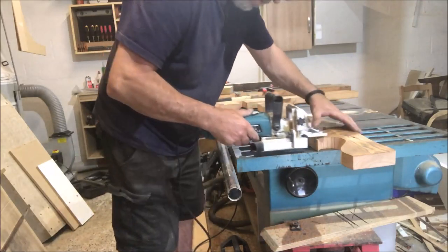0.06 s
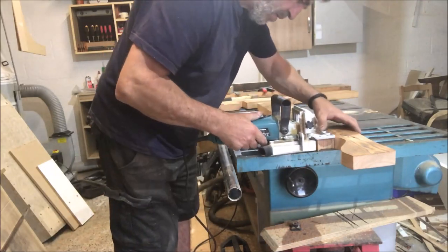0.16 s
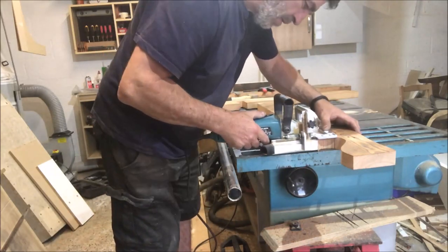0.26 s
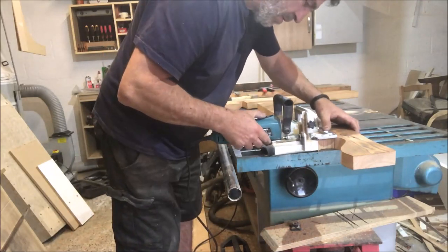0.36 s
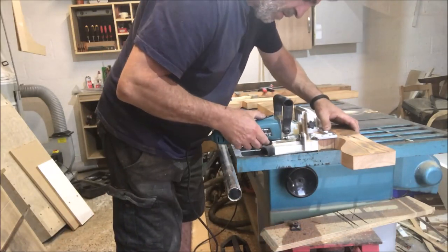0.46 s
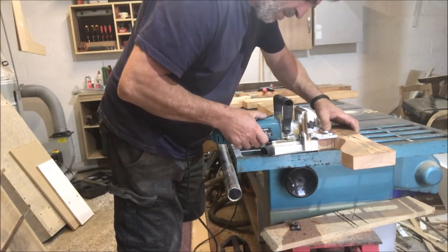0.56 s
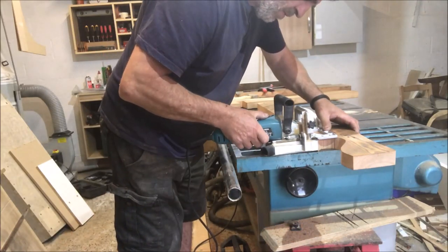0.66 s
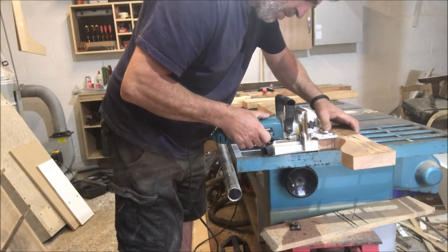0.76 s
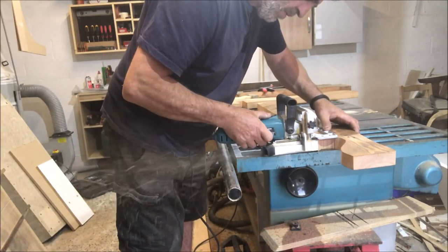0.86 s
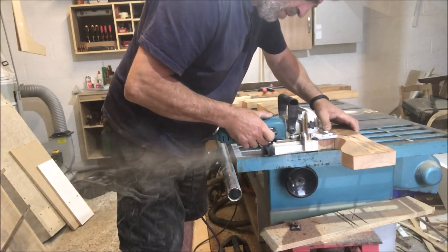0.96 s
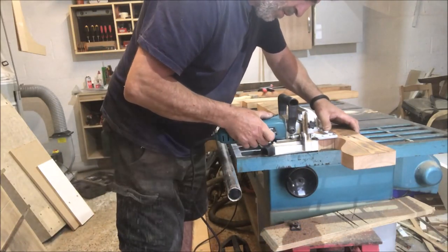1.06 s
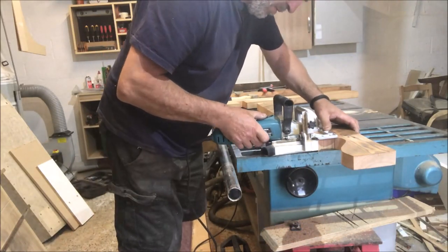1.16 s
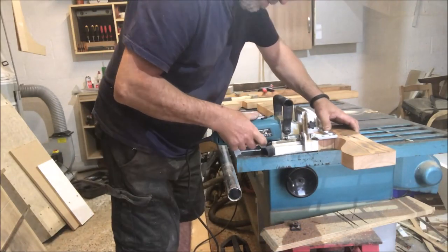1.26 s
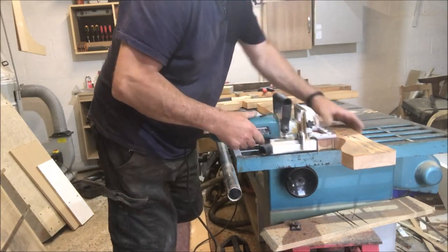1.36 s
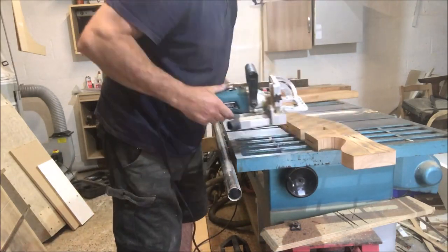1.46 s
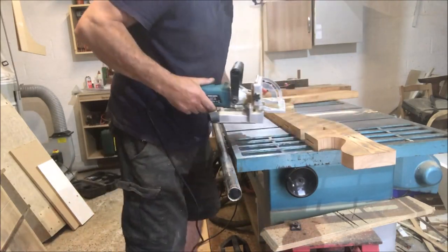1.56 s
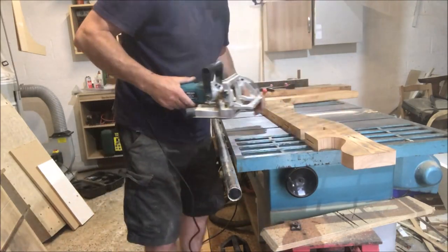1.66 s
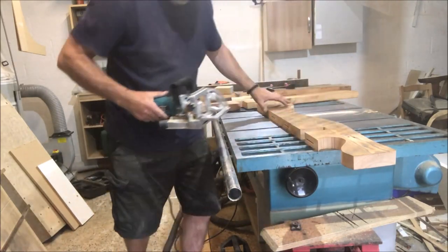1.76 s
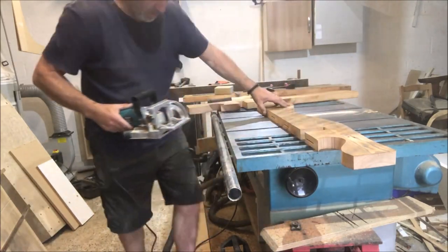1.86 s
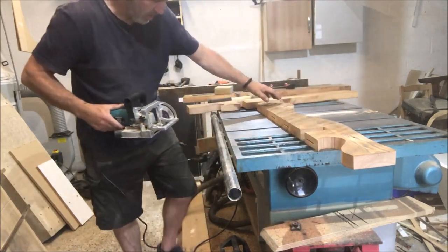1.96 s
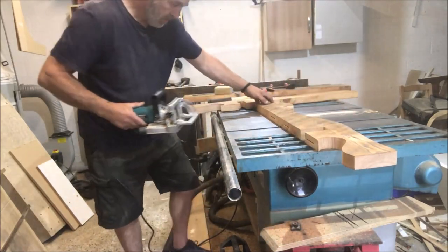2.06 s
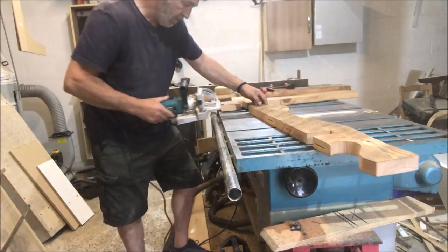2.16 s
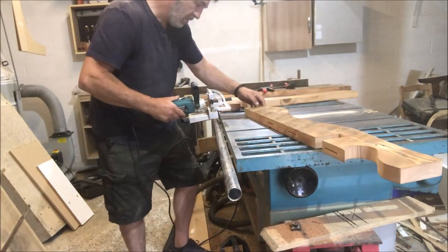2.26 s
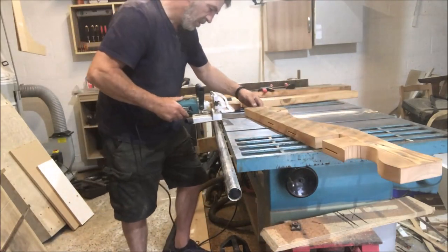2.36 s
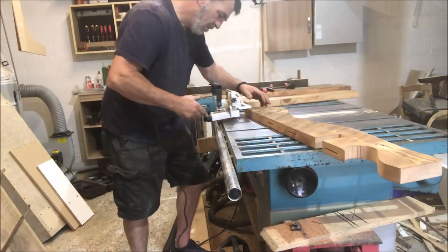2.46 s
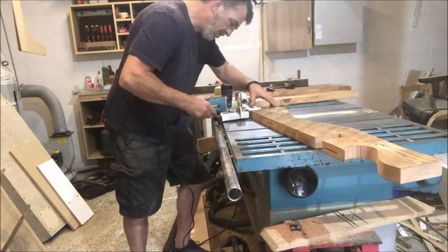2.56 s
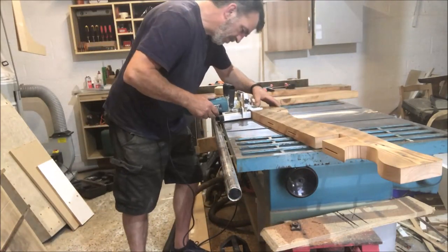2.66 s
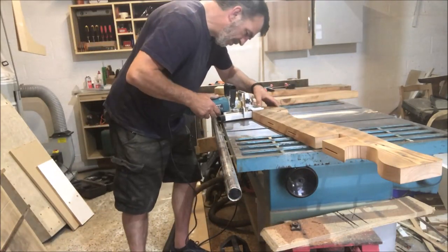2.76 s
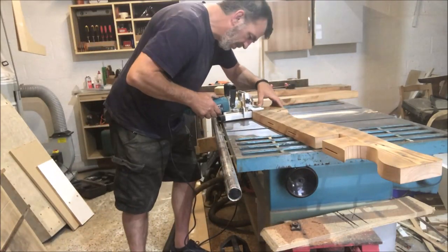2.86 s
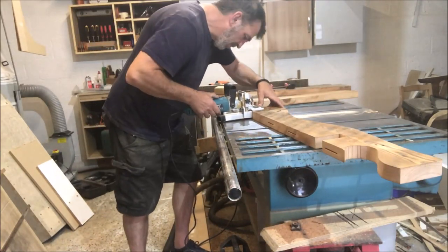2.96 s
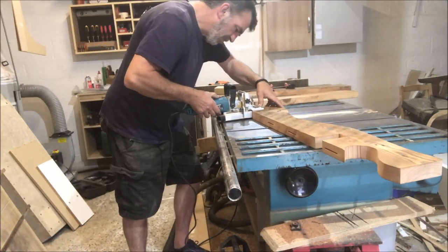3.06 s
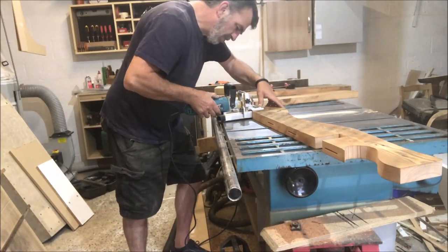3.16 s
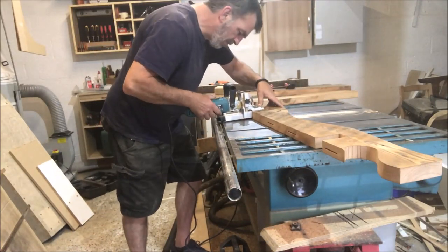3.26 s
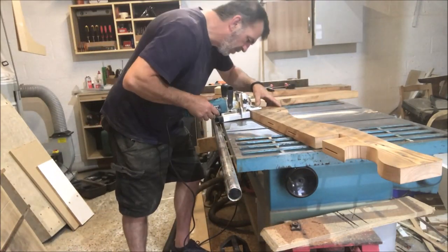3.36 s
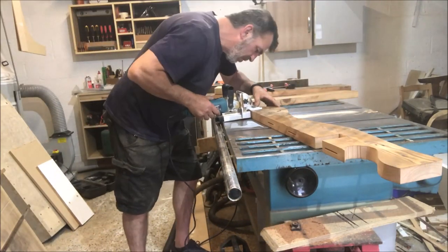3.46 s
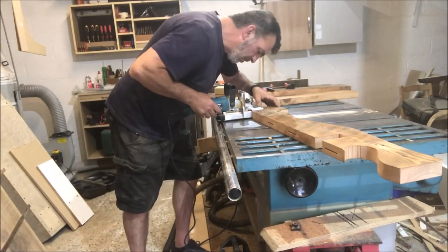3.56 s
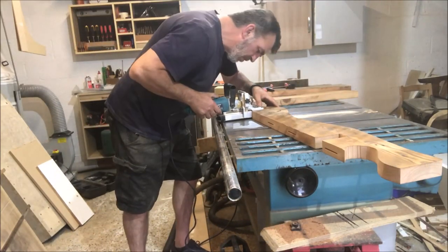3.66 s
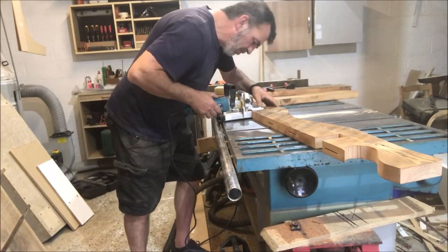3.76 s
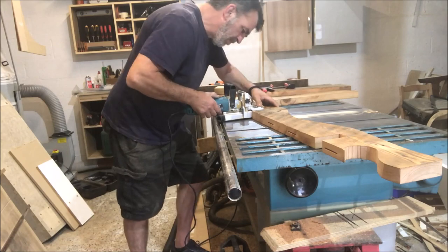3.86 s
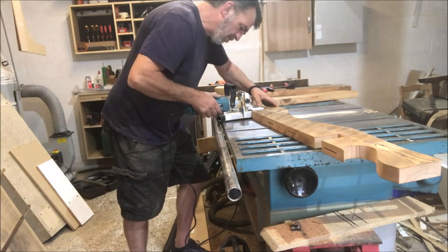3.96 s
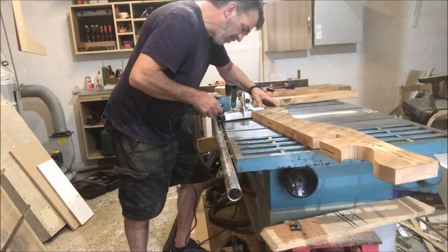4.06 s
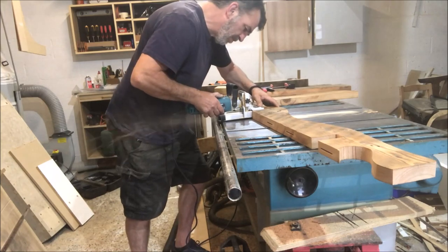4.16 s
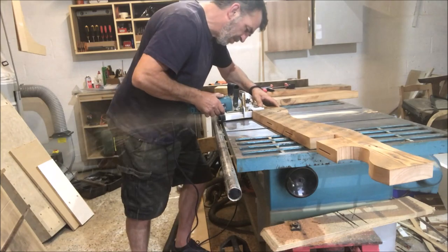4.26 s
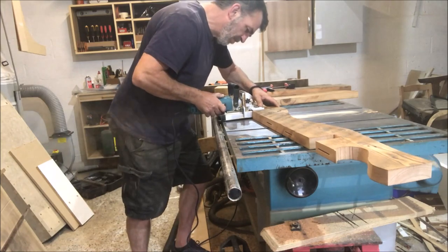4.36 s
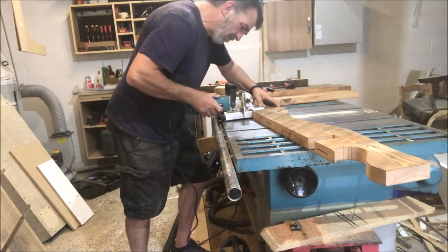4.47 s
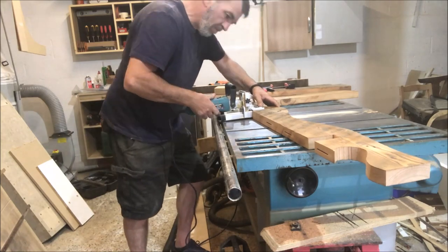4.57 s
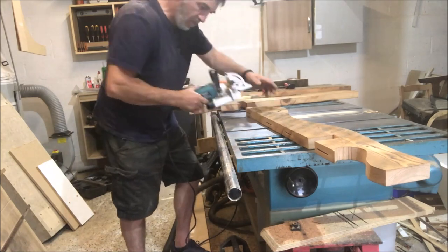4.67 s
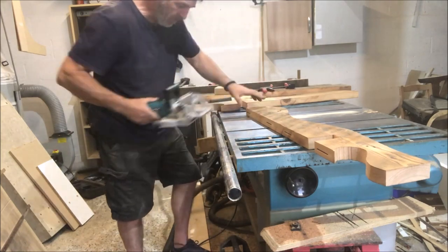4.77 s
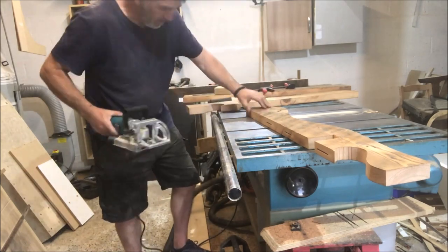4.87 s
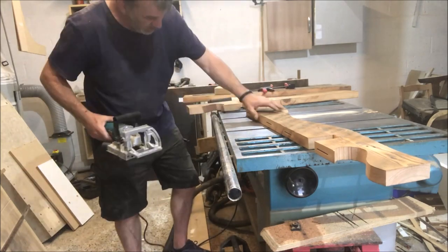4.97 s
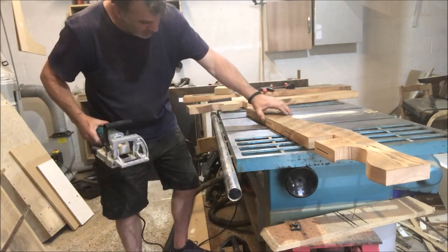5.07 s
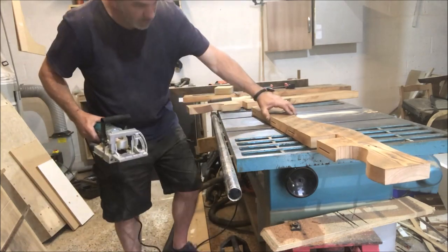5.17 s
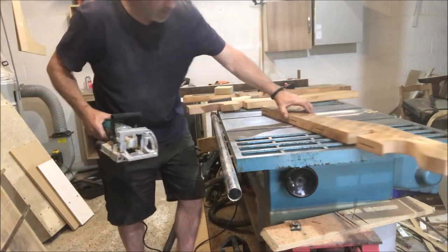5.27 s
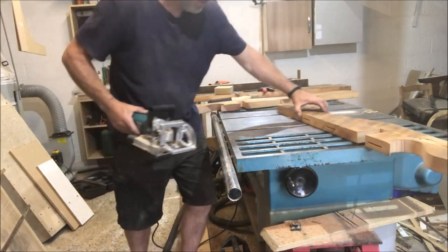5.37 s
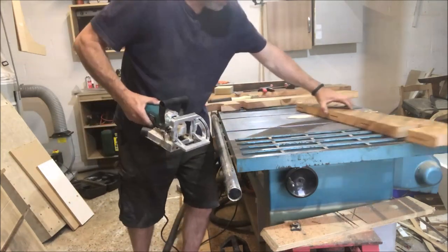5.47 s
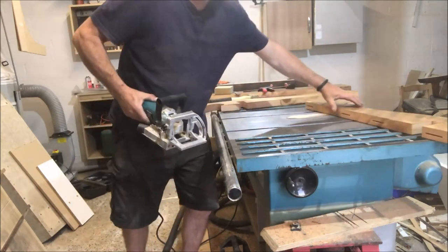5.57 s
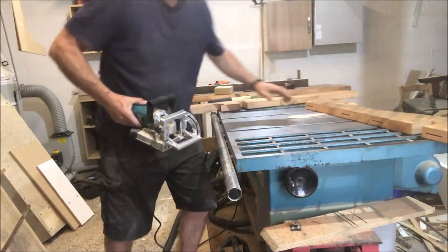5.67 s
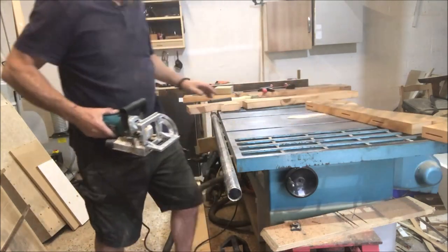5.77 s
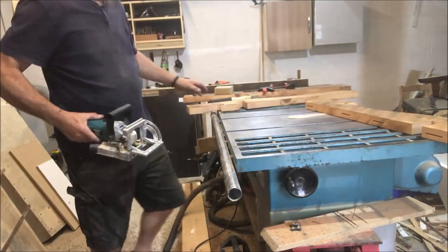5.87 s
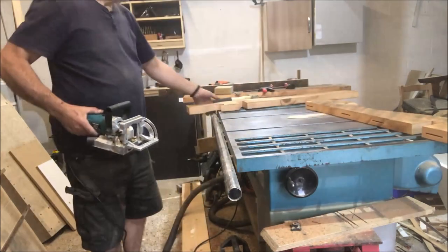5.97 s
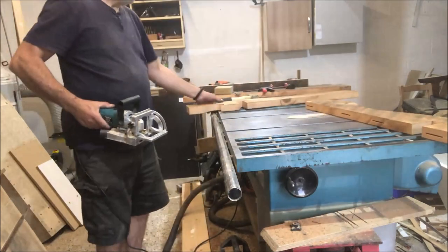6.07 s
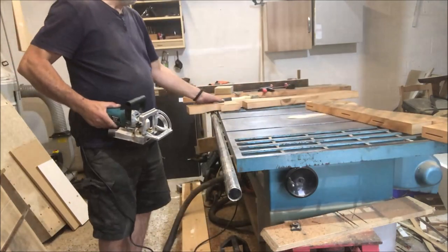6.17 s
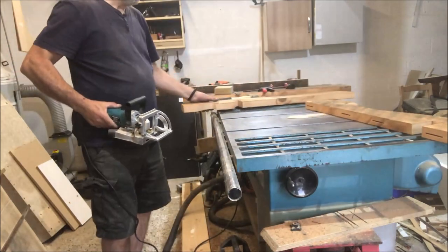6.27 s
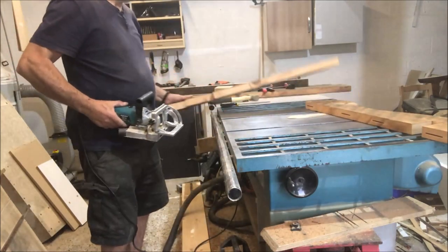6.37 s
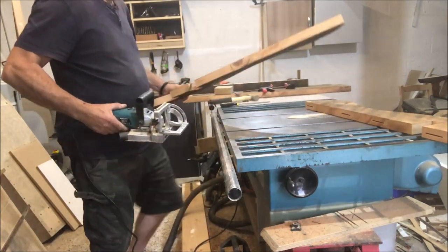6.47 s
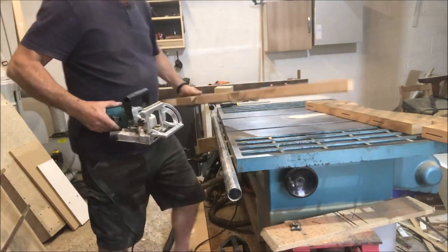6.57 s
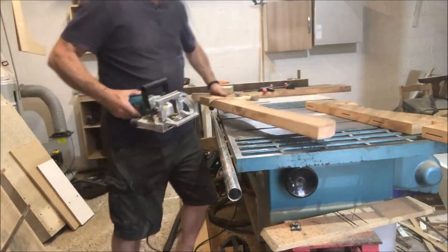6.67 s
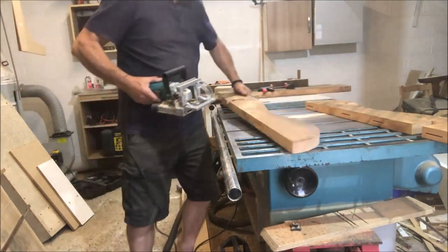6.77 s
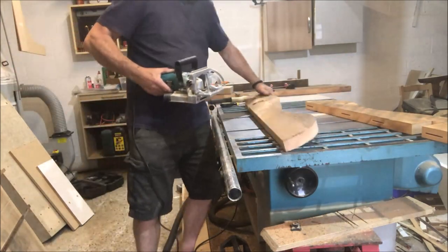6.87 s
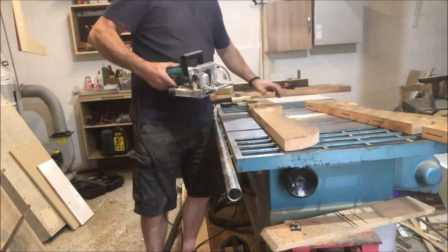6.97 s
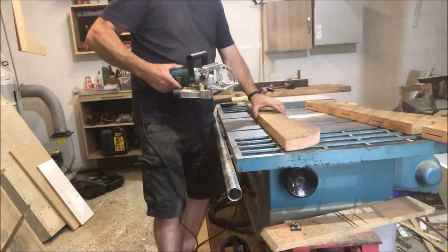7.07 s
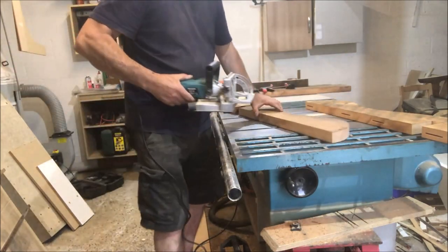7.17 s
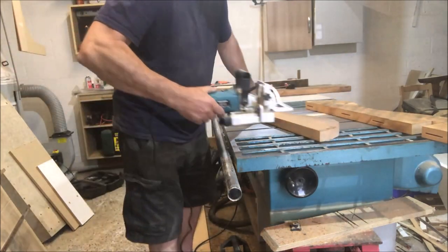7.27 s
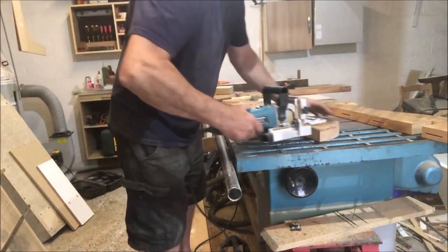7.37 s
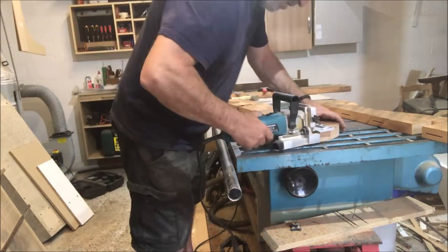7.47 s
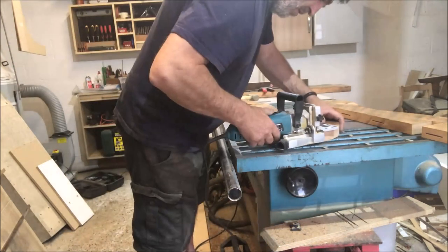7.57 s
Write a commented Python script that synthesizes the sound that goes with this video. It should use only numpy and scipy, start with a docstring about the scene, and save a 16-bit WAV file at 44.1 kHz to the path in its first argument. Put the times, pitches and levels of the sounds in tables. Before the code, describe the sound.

In a small cluttered workshop, a plate joiner is already coasting, with a brief rub along wood. It slams on, screams with rushing air, growls into a board, then whines down into rattling gear clicks and a light scrape. A second burst and cut follow, with another long rattling wind-down. Boards knock softly, then one slaps hard on a steel table. Close, dry, bright sound with thin bass and faint machine hum.

```python
"""Plate joiner and boards in a workshop

A plate joiner coasts, then is twice switched on, plunged into a board and left to wind down.
Gears and fan whine as tones locked to the blade's rotation, over rushing air made of shaped noise;
the blade loads the motor in the cut, and the gear play rattles as impacts on modes of the gear case.
Boards are knocked about and one is slapped onto a steel saw table, over a faint machine hum.
"""
import sys
import numpy as np
from scipy import signal
from scipy.fft import rfft, irfft, next_fast_len
from scipy.io import wavfile
from scipy.ndimage import uniform_filter1d

SR = 44100
rng = np.random.default_rng(int(sys.argv[2]) if len(sys.argv) > 2 else 0)


def to_wav(sig):
    """Store sig (one row per channel, or 1-D mono) as 16-bit WAV at the path in sys.argv[1].

    Samples outside -1..1 are clipped; the rate is SR.
    """
    pcm = np.clip(np.atleast_2d(sig), -1, 1) * 32767
    pcm = np.round(pcm).astype(np.int16)
    wavfile.write(sys.argv[1], SR, pcm.T)  # frames by channels


N = 335601
T = np.arange(N) / SR  # time [s]
HZ = np.fft.rfftfreq(next_fast_len(N + SR // 4, True), 1 / SR)  # frequency grid of all responses [Hz]
TOP_HZ = 16000  # upper edge of the sound


def undb(db):
    """Level law: decibels to amplitude gain."""
    return np.exp(np.asarray(db) * (np.log(10) / 20))


def unit(x):
    """Normalisation: scale to rms 1."""
    return x / np.sqrt(np.mean(x ** 2))


def colour(points):
    """Spectral envelope: gain on HZ from (frequency [Hz], level [dB]), even in log frequency."""
    hz, db = np.transpose(points)
    return undb(np.interp(np.log(HZ + 1), np.log(hz), db))


def resonances(modes):
    """Modal sum: resonances (frequency [Hz], width [Hz], level [dB]) of alternating sign."""
    response = 0
    for k, (hz, width, db) in enumerate(modes):
        detuning = (HZ - hz ** 2 / (HZ + 1)) / width
        response = response + (-1) ** k * undb(db) / (1 + 1j * detuning)
    return response


def shaped(x, response):
    """Linear filtering: multiply the spectrum by a response given on HZ."""
    return irfft(rfft(x, 2 * (len(HZ) - 1)) * response)[:N]


def noise(response):
    """Coloured noise: a random spectrum under a response, at rms 1."""
    spectrum = rng.standard_normal(2 * len(HZ)).view(complex)
    return unit(irfft(spectrum * response)[:N])


def walk(rate):
    """Slow random modulation: chance values joined at a rate [1/s], rms 1."""
    steps = rng.standard_normal(N // 64)
    return unit(np.interp(T * rate, np.arange(len(steps)), steps))


def bursts(rows):
    """Exponential decay: envelope of blows (time [s], level [dB], t60 [s]), added in power."""
    power = np.zeros(N)
    for s, db, t60 in rows:
        start = int(s * SR)
        age = T[:min(N - start, int(1.5 * t60 * SR))]
        power[start:start + len(age)] += undb(db - 60 * age / t60) ** 2
    return np.sqrt(power)


# the blade is pushed in and drawn back: (touching [s], deepest [s], clear [s], bite [0-1])
PLUNGE_TIMES = [(.79, 1.07, 1.245, 1), (4.14, 4.385, 4.59, .95)]


def bite(plunge):
    """Cutting load: it rises evenly to the deepest point and falls as the blade is drawn back."""
    touch, deepest, clear, depth = plunge
    return np.interp(T, [touch, deepest, clear], [0, depth, 0])


FRICTION, FAN_DRAG = 39.61, .006431  # coasting loses FRICTION + FAN_DRAG * speed ** 2 [rev/s per s]


def coast(speed, age):
    """Deceleration by quadratic drag and dry friction: drag rules first, friction stops the blade."""
    even = np.sqrt(FRICTION / FAN_DRAG)  # the speed at which both brake alike
    return even * np.tan(np.maximum(np.arctan(speed / even) - age * FRICTION / even, 0))


FREE_SPEED, OPENING_SPEED = 183, 115.5  # running free, and coasting at the opening [rev/s]
SPIN_UP_S, SAG_SPEED = .057, 34  # time constant under power; rev/s lost at full bite
# the trigger is held: (on [s], off [s])
TRIGGER_TIMES = [(.698, 1.2547), (4.044, 4.5654)]


def blade_speed(load):
    """First-order spin-up [rev/s]: the held trigger races the motor, load sags it, release lets it coast."""
    speed = coast(OPENING_SPEED, T)
    for on_s, off_s in TRIGGER_TIMES:
        on, off = int(on_s * SR), int(off_s * SR)
        missing = (FREE_SPEED - speed[on]) * np.exp(-T[:N - on] / SPIN_UP_S)
        speed[on:] = FREE_SPEED - missing - SAG_SPEED * load[on:]
        speed[off:] = coast(speed[off], T[:N - off])
    return speed


# hiss, rasp and roar: (level at full speed [dB], power of speed [-], level added at full bite [dB])
RUSH_LAWS = [(-20, 1.24, 1), (-27, 1.53, -2.5), (-42.5, 1.8, 0)]
# further gain of the treble hiss: (time [s], level [dB])
HISS_GAIN = [(0, -0.5), (.6, 0), (.8, 2.5), (1.05, 1), (1.3, -0.5), (1.6, -0.5), (2.1, -3.5), (2.6, -5.5),
             (4.1, 2), (4.7, 0), (5.3, 0), (6.2, -3.5)]


def rush_gains(speed, load):
    """Power law of flow noise: gains of hiss, rasp and roar follow powers of speed and shift with load."""
    hiss, rasp, roar = [undb(db + load_db * load) * (speed / FREE_SPEED) ** power
                        for db, power, load_db in RUSH_LAWS]
    return hiss * undb(np.interp(T, *np.transpose(HISS_GAIN))), rasp, roar


# relative spectrum of the rush at high speed: (frequency [Hz], level [dB per Hz])
FAST_SPECTRUM = [(70, -41.5), (130, -54.5), (250, -26.5), (500, -22.5), (900, -12.5), (1500, -11),
                 (2400, -10.5), (3300, -4.5), (4200, -2), (5200, -2), (7000, 0.5), (9000, 5), (12000, 3),
                 (15000, 2.5)]
# the same at low speed, before the gear case colours it: (frequency [Hz], level [dB per Hz])
SLOW_SPECTRUM = [(70, -75.5), (140, -28), (230, -43.5), (500, -68), (1000, 1.5), (2100, 1), (2900, 3.5),
                 (3700, 5), (4400, 8), (5400, -1.5), (6600, -2.5), (9500, -2.5), (12500, -3), (15500, -6.5)]
# modes of the gear case: (frequency [Hz], width [Hz], level [dB])
CASE_MODES = [(2630, 150, -2), (2960, 170, 0), (3550, 400, -7.5), (4400, 700, -6.5), (6340, 260, 8.5),
              (6876, 60, 14), (7360, 200, 4.5), (7850, 130, 9.5), (9230, 770, 10.5), (10450, 700, 7.5),
              (12450, 1500, 7.5), (14630, 1300, 1.5)]
AIR_WAVER_DB = 1.73  # slow waver of each band


def air(speed, turn, gains):
    """Broadband flow and bearing noise: it pulses with the shaft; the gear case colours it when slow."""
    fast = np.clip((speed / FREE_SPEED - .3) / .5, 0, 1)
    case = abs(resonances(CASE_MODES))
    low = 1 / (1 + (HZ / 1500) ** 8)
    high = 1 / (1 + (5000 / (HZ + 1)) ** 10)
    middle = np.clip(1 - low - high, 0, 1)
    out = 0
    for share, gain in zip([high, middle, low], gains):
        blown = noise(colour(FAST_SPECTRUM) * np.sqrt(share))
        ground = noise(colour(SLOW_SPECTRUM) * np.sqrt(share) * (0.5 + case))
        mixed = np.sqrt(fast) * blown + np.sqrt(1 - fast) * undb(-1.5) * ground
        out = out + gain * undb(AIR_WAVER_DB * walk(14)) * mixed
    return out * (1 + .05 * np.sin(turn)) * undb(.7 * walk(600))


# shaft, bearing, gear mesh, second bearing, fan and the mesh's octave: (multiple of blade speed [-],
# phase wander [rad rms], base level at full speed [dB], power of speed [-], level added at full bite [dB])
LEADING_ORDERS = [(4, .3, -60, 3, -8), (12.4, .22, -40.5, 2.3, -4), (24.1, .2, -41, 3.2, 4.5),
                  (28.8, .25, -47, 2, -6), (31.75, .25, -44, 1.6, -5), (48, .35, -42, 1.3, 0)]
# for each leading tone, the resonances of its carrier: (frequency [Hz], width [Hz], lift [dB])
CARRIER_RESONANCES = [
    [(650, 150, 16.5)],
    [(1500, 300, 2.5)],
    [(3600, 520, 10), (4330, 260, 4)],
    [(4100, 420, 13)],
    [(3020, 340, 10.5), (3500, 200, 8)],
    [(6340, 400, 3), (4400, 400, 5)],
]
LEAD_FLUTTER_DB = 1.8
LEAD_FADE_SPEED = 68  # below this the tones sink into the rush [rev/s]
DRONE_MULTIPLE = 4  # of blade speed
# drone of the board in the cut: level at a bite of 1 for each plunge [dB]
DRONE_LEVELS = [-50, -33]
# one tone flares as the joiner is pressed down or turned:
# (multiple of blade speed [-], rising [s], loudest [s], gone [s], lift [dB])
TONE_FLARES = [(4, 1.22, 1.3, 1.46, 6), (4, 4.5, 4.62, 4.74, 5), (12.4, .38, .52, .62, 13),
               (12.4, .56, .615, .67, 10), (12.4, 1.17, 1.25, 1.45, 4), (24.1, .9, 1.01, 1.12, 4),
               (24.1, 1.16, 1.23, 1.3, 5), (24.1, 1.38, 1.44, 1.49, 7), (48, 1.43, 1.515, 1.6, 11),
               (48, 4.15, 4.26, 4.34, 8), (24.1, 4.62, 4.72, 4.8, 5), (28.8, 4.68, 4.76, 4.87, 6)]


def leading_tones(speed, turn, load):
    """Order tones: integrated rotation sets their phase; gliding through resonances swells them."""
    out = 0
    drive = np.minimum(speed / LEAD_FADE_SPEED, 1) ** 5
    for (multiple, wander, db, power, bite_db), swells in zip(LEADING_ORDERS, CARRIER_RESONANCES):
        lift = sum(lift_db * np.exp(-(2 * (multiple * speed - hz) / width) ** 2 / 2)
                   for hz, width, lift_db in swells)
        level = db + lift + bite_db * load + LEAD_FLUTTER_DB * walk(29)
        size = drive * (speed / FREE_SPEED) ** power * undb(level)
        if multiple == DRONE_MULTIPLE:
            drone = sum(undb(cut_db) * bite(plunge) for plunge, cut_db in zip(PLUNGE_TIMES, DRONE_LEVELS))
            size = np.hypot(size, drone)
        flare = sum(np.interp(T, times, [0, flare_db, 0])
                    for which, *times, flare_db in TONE_FLARES if which == multiple)
        size = size * undb(flare)
        out = out + np.sqrt(2) * size * np.sin(multiple * turn + wander * walk(70))
    return out


# lesser tones of blade and gears: (multiple of blade speed [-], level against the hiss running free [dB],
# level added in amplitude under load [dB], power of bite [-], phase wander [rad rms])
LESSER_ORDERS = [(8, -40, -11.5, 2.5, .3), (19.6, -38, -17, 1, 1.1), (20.3, -29, -10, .6, .8),
                 (21.2, -36, -17, .6, 1.1), (22.4, -38, -20, 1, .9), (26.2, -29, -30, 1, .7),
                 (35, -26, -32, 1, .7), (37, -26, -34, 1, .8), (44, -25, -30, 1, .7), (40, -26, -30, 1, .7),
                 (53, -27, -19, 1, .9), (56, -27, -21, 1, .6), (68, -26, -22, 1, .5), (72, -24, -22, 1, .5)]
# fine tooth and bearing ripple: (multiple of blade speed [-], level over the hiss before the ring [dB])
RIPPLE_ORDERS = [(96, -9), (144, -8), (203, -12), (215, -14), (288, -6), (432, -10), (576, -1.5)]


def whine(speed, turn, load, hiss):
    """Shaft orders: the cut adds rough blade tones, and fine ripple sweeps a housing resonance."""
    out = leading_tones(speed, turn, load)
    spin = np.clip((speed - 40) / 55, 0, 1)
    chop = 1 + 0.073 * np.sin(turn)  # a slight run-out makes the blade bite once a turn
    for multiple, free_db, load_db, power, wander in LESSER_ORDERS:
        flutter = undb(3 * walk(35))
        size = hiss * spin * (undb(free_db) + load ** power * chop * undb(load_db)) * flutter
        out = out + size * np.sin(multiple * turn + wander * walk(80))
    ripple = 0
    for multiple, db in RIPPLE_ORDERS:
        in_band = multiple * speed < TOP_HZ
        ripple = ripple + undb(db) * in_band * np.sin(multiple * turn + 1.3 * walk(380))
    return out + hiss * shaped(ripple, resonances([(14800, 3800, 0)]))


ECHO_DB, ECHO_T60_S = -10, .07  # reflections off table and walls


def fading(tones):
    """Interference: gliding tones beat with their own reflections, so they swell and break up."""
    age = T[:SR // 8]
    tail = rng.standard_normal(len(age)) * undb(-60 * age / ECHO_T60_S) * (age > .003)
    echo = signal.fftconvolve(tones, tail / np.linalg.norm(tail))[:N]
    return (tones + undb(ECHO_DB) * echo) / np.hypot(1, undb(ECHO_DB))


def chatter():
    """Irregular impact train: envelope of small ticks at uneven gaps, about ninety a second."""
    chance = rng.random((900, 3))
    times = np.cumsum(.004 + .014 * chance[:, 0])
    return bursts([(s, -12 * size, .016 + .012 * ring)
                   for s, (_, size, ring) in zip(times, chance) if s < T[-1]])


# the hardest clacks of gear play: (time [s], level of the blow [dB])
HARD_CLACKS = [(1.813, -18), (1.829, -19), (1.910, -18), (1.950, -17), (2.055, -22), (2.072, -23),
               (2.183, -21), (2.247, -24), (2.282, -22), (2.294, -23), (2.347, -24), (2.374, -25),
               (2.402, -24), (2.431, -24), (2.454, -25), (2.478, -23), (2.506, -22), (2.523, -25),
               (2.553, -27), (2.586, -21), (2.607, -25), (2.637, -22), (2.663, -26), (2.690, -22),
               (2.713, -22), (2.739, -23), (2.768, -24), (2.787, -22), (2.813, -22), (2.840, -24),
               (2.863, -25), (2.884, -22), (2.910, -24), (2.951, -25), (2.999, -27), (3.025, -28),
               (3.050, -29), (3.070, -27), (3.109, -27), (3.283, -30), (5.567, -22), (5.614, -23),
               (5.659, -24), (5.689, -19), (5.720, -24), (5.736, -25), (5.762, -21), (5.795, -27),
               (5.816, -21), (5.845, -20), (5.861, -18), (5.912, -21), (5.930, -21), (5.947, -24),
               (5.976, -25), (5.995, -23), (6.021, -26), (6.056, -23), (6.079, -21), (6.100, -24),
               (6.128, -25), (6.152, -23), (6.178, -26), (6.200, -26), (6.227, -26), (6.256, -28),
               (6.290, -28), (6.315, -29), (6.343, -29), (6.369, -27), (6.394, -29), (6.420, -30),
               (6.446, -29), (6.508, -29), (6.535, -32), (6.559, -30), (6.576, -31), (6.590, -31),
               (6.607, -31), (6.634, -31), (6.657, -34), (6.716, -34), (6.733, -32), (6.747, -32),
               (6.789, -35), (6.810, -36)]
RATTLE_SPEED, SOFT_SPEED = 115, 33  # play opens below the first; clacks crowd below the second [rev/s]
CLACK_GAP_S, LAST_GAP_S, GAP_SCATTER = .015, .009, .28  # scatter is of the gap's logarithm
CLACK_DB, CLACK_SCATTER_DB = -30.5, 2.0  # lesser blows at SOFT_SPEED, and their spread
CLACK_POWER = .45  # their force grows as this power of speed


def clack_train(speed):
    """Backlash impacts (time [s], level [dB]): between hard blows the gears rock across their play."""
    rows, s = list(HARD_CLACKS), 0
    hard = np.array(HARD_CLACKS)[:, 0]
    for gap, size in rng.standard_normal((700, 2)):
        now = speed[min(int(s * SR), N - 1)]
        force = now / SOFT_SPEED
        driven = any(on < s < off for on, off in TRIGGER_TIMES)
        if 0 < now < RATTLE_SPEED and not driven and abs(s - hard).min() > LAST_GAP_S:
            rows.append((s, CLACK_DB + 20 * np.log10(force ** CLACK_POWER) + CLACK_SCATTER_DB * size))
        mean_gap = LAST_GAP_S + (CLACK_GAP_S - LAST_GAP_S) * min(force, 1)
        s += mean_gap * np.exp(GAP_SCATTER * gap)
    return rows


CLACK_COLOUR_DB = 3.2  # scatter of each blow from mode to mode
CRACK_T60_S = .011  # the blow itself
CLACK_RING_DB, CLACK_RING_T60_S = -9, .06  # and the ring that follows it
CLACK_EDGE_HZ = 85  # per rev/s: faster blows ring mainly the modes above this
CLACK_DULL_HZ, CLACK_BRIGHTEN_HZ = 6500, 400  # treble edge of the softest blows, and its rise per rev/s
LOW_MODES_HZ = 5000  # modes below this carry the soft blows
# held in the air, the low modes ring louder: (from [s], fully at [s], lift [dB])
HELD_IN_AIR = (5.8, 6.5, 6)


def rattle(speed, hiss, ticks):
    """Impact excitation of modes: clacks ring each case mode by its own amount, lower as blows soften."""
    loose = np.clip(1.0 - speed / 80, .25, 1)
    small = ticks * hiss * loose * undb(10)
    train = clack_train(speed)
    soft = np.clip(1 - speed / 35, 0, 1)
    case_rms = np.sqrt(np.mean(abs(resonances(CASE_MODES)) ** 2))
    free = undb(np.interp(T, HELD_IN_AIR[:2], [0, HELD_IN_AIR[2]]))
    clacks = 0
    for mode in CASE_MODES:
        hz = mode[0]
        struck = [(s, db - CLACK_COLOUR_DB * abs(own))
                  for (s, db), own in zip(train, rng.standard_normal(800))]
        cracks = [(s, db, CRACK_T60_S) for s, db in struck]
        rings = [(s, db + CLACK_RING_DB, CLACK_RING_T60_S) for s, db in struck]
        blows = bursts(cracks + rings)
        blows = blows / np.hypot(1, (CLACK_EDGE_HZ * speed / hz) ** 2)
        blows = blows / np.hypot(1, (hz / (CLACK_DULL_HZ + CLACK_BRIGHTEN_HZ * speed)) ** 2)
        gain = 1 / case_rms
        if hz < LOW_MODES_HZ:
            gain = (gain + soft * undb(-3.5)) * free
        strike = gain * np.hypot(small, blows) * rng.standard_normal(N)
        clacks = clacks + shaped(strike, resonances([mode]))
    return clacks


# tones of a distant machine: (frequency [Hz], mean level [dB rms])
HUM_TONES = [(399, -69), (801, -64), (1201, -71), (1603, -78)]
# relative spectrum of the still air: (frequency [Hz], level [dB per Hz])
STILL_AIR = [(50, -55), (90, -17), (150, -6.5), (250, 0.5), (500, -6), (900, -5), (1500, -14.5),
             (2500, -14.5), (5000, -17), (10000, -18), (15000, -16)]
SHOP_DB = -61.5  # mean level of the still air, rms


def shop():
    """Steady background: a distant machine's wavering tones over coloured noise."""
    hum = 0
    for hz, db in HUM_TONES:
        size = np.sqrt(2) * undb(db + 1.0 * walk(2.4))
        hum = hum + size * np.sin(2 * np.pi * hz * T + 0.52 * walk(3.8))
    return hum + undb(SHOP_DB) * noise(colour(STILL_AIR)) * undb(walk(1.0))


# the fence rubs along the plank: (time [s], length [s], level [dB])
FENCE_RUBS = [(.38, .33, -43)]
# the base chatters on the table as it is lined up: (time [s], length [s], level [dB])
BASE_SCRAPES = [(2.65, 0.3, -56.5), (2.902, 0.52, -52.5), (3.358, 0.2, -48.5)]
# what the base rings: (frequency [Hz], width [Hz], level [dB])
SCRAPE_MODES = [(380, 140, -12), (636, 42, -3.5), (800, 35, 3), (1643, 73, -2.5), (3360, 210, -5),
                (5400, 310, -8.5), (6400, 220, -6)]
# the plank being slotted: (frequency [Hz], width [Hz], level [dB])
PLANK_MODES = [(880, 250, -4), (1240, 250, -4), (1730, 260, 1), (2050, 400, -3), (2600, 600, -1)]
SCRAPE_EDGE_S = 0.067  # fade at each end
SCRAPE_GRAIN = .55  # 0 an even drag, 1 separate slips


def scrapes(ticks):
    """Stick-slip friction: grainy noise rings the plank under the fence, then the steel under the base."""
    out = 0
    for rows, ring in [(FENCE_RUBS, PLANK_MODES), (BASE_SCRAPES, SCRAPE_MODES)]:
        push = sum(undb(db) * np.clip(np.minimum(T - s, s + length - T) / SCRAPE_EDGE_S, 0, 1)
                   for s, length, db in rows)
        slips = ticks ** SCRAPE_GRAIN * rng.standard_normal(N)
        out = out + push * unit(shaped(slips, resonances(ring)))
    return out


# the gears slam together at switch-on: (time [s], level [dB], t60 [s])
GEAR_SLAMS = [(0.6984, -10.5, 0.19), (4.0442, -13, 0.2)]


def slam():
    """Impact noise: a decaying burst of coloured noise as the gears slam together."""
    slam_colour = colour([(100, -46.0), (400, -11.5), (2000, -9.0), (3400, -2.0), (4300, -4.0),
                          (7000, 2.5), (10000, 3), (16000, -4.5)])
    return bursts(GEAR_SLAMS) * noise(slam_colour)


BUZZ_HZ = 403
# hum on each pull of the trigger: (level at the inrush [dB rms], fade [dB per s])
INRUSH_HUM = [(-45, 10), (-43.5, 32)]


def buzz():
    """Magnetic hum: the motor's iron hums at one pitch while current flows, most at the inrush."""
    on = 0
    for (start, stop), (db, fade_db) in zip(TRIGGER_TIMES, INRUSH_HUM):
        on = on + (T > start) * (T < stop) * undb(db - fade_db * np.clip(T - start, 0, 1))
    return np.sqrt(2) * uniform_filter1d(on, size=400) * np.sin(2 * np.pi * BUZZ_HZ * T + 0.5 * walk(40))


# the rush dips briefly: (time [s], half length [s], depth [0-1])
RUSH_DIPS = [(0.716, 0.015, 0.68), (0.873, 0.0092, 0.65), (1.238, 0.0047, 0.7), (1.654, 0.023, 0.8),
             (2.087, 0.011, 0.2), (4.31, 0.017, 0.5), (4.502, 0.0083, 0.6), (4.881, 0.016, 1),
             (4.97, 0.018, 0.86), (5.26, 0.01, 0.3)]
DIP_EDGE_HZ = 9700


def dipped(x):
    """Amplitude modulation by band: the rush dips briefly now and then, least in the top treble."""
    dip = sum(np.clip(depth, 0, 1) * np.exp(-((T - s) / half) ** 4) for s, half, depth in RUSH_DIPS)
    return x - dip * shaped(x, 1 / (1 + (HZ / DIP_EDGE_HZ) ** 2))


TEETH = 6
CHIP_DB, CHIP_ROUGH_DB = -32, 8.5  # level at full bite; scatter of the tearing
REPEAT_SHARE = .45  # share of the grit's power that repeats with each turn
RUN_OUT = .8  # share by which the growl throbs once a turn
# what the chips ring in blade and guard: (frequency [Hz], width [Hz], level [dB])
BLADE_MODES = [(857, 820, -18.5), (3130, 670, -4.5), (4470, 800, -27.5), (8500, 180, 3)]
# growl of the plank: level at a bite of 1 for each plunge [dB]
GROWL_LEVELS = [-32, -42]


def chips(turn, load):
    """Periodic cutting force: teeth tear chips, partly alike on every turn, ringing blade and plank."""
    rim = rng.standard_normal(256)
    repeating = np.interp(turn / (2 * np.pi) % 1, np.linspace(0, 1, len(rim)), rim)
    fresh = rng.standard_normal(N)
    grit = np.sqrt(REPEAT_SHARE) * unit(repeating) + np.sqrt(1 - REPEAT_SHARE) * fresh
    roughness = undb(CHIP_ROUGH_DB * np.tanh(walk(500)))
    tearing = (1 + np.cos(TEETH * turn)) * roughness * grit
    blade = undb(CHIP_DB) * np.sqrt(load) * unit(shaped(tearing, resonances(BLADE_MODES)))
    growl = sum(undb(db) * np.sqrt(bite(plunge)) for plunge, db in zip(PLUNGE_TIMES, GROWL_LEVELS))
    throbbing = tearing * (1 + RUN_OUT * np.sin(turn))
    return blade + growl * unit(shaped(throbbing, resonances(PLANK_MODES)))


# the joiner is lifted off the board: (rising [s], loudest [s], gone [s], level at the loudest [dB rms])
LIFT_SWELLS = [(1.5, 1.663, 1.84, -33), (4.68, 4.835, 4.9, -34)]
HOUSING_HZ, HOUSING_WIDTH_HZ = 4250, 800


def housing():
    """Narrow-band resonance: lifted off the board, the housing rings roughly at one pitch."""
    swell = sum(np.interp(T, [rising, loudest, gone], [0, undb(db), 0])
                for rising, loudest, gone, db in LIFT_SWELLS)
    return swell * noise(resonances([(HOUSING_HZ, HOUSING_WIDTH_HZ, 0)]) ** 2)


# wood and tool knocking on the table: (time [s], level [dB], dull above [Hz], t60 [s])
TABLE_KNOCKS = [(2.661, -49, 1200, 0.15), (5.314, -48.5, 1500, 0.73), (5.423, -34, 900, 0.07),
                (5.895, -49.5, 700, 0.16), (6.395, -39.5, 1500, 0.092), (6.416, -47, 800, 0.081),
                (6.87, -35, 2890, 0.15), (6.883, -33.5, 2510, 0.047), (6.943, -40.5, 2000, 0.096),
                (6.983, -37.5, 2000, 0.45), (7.211, -41, 1400, 0.18), (7.240, -36.5, 3000, 0.069),
                (7.256, -48.5, 2530, 0.46), (7.442, -50, 6000, .08), (7.524, -35, 8900, 0.098)]
# modes of a board: (frequency [Hz], width [Hz], level [dB])
BOARD_MODES = [(254, 15, -11), (380, 210, -10), (727, 440, 0), (1030, 520, 2.5), (1250, 310, 0),
               (1592, 62, 2), (2680, 650, -8), (3970, 160, 0), (4370, 300, -7), (5600, 470, -3.5),
               (8000, 11000, -13)]
# a board slapped flat on the table, its crack, ring and bounce: (time [s], level [dB], t60 [s])
BOARD_SLAP = [(7.0202, -5.5, 0.032), (7.0205, -12, 0.09), (7.0325, -17, 0.045)]
# relative spectrum of the slap: (frequency [Hz], level [dB per Hz])
SLAP_SPECTRUM = [(59, -65.5), (100, -33), (608, -12.5), (1480, -8), (1650, -1), (2000, -16.5), (2470, 0.5),
                 (3190, -13.5), (3860, -0.5), (4980, -13), (5300, 4), (6420, -6), (7610, -3), (8280, -8.5),
                 (16000, -27)]
# modes of the steel table: (frequency [Hz], level [dB], t60 [s])
TABLE_MODES = [(3031, -55, .4), (4436, -55, .9), (6272, -57, 1.0), (7337, -58, .6), (8845, -54, .5),
               (10850, -64, .8)]


def boards():
    """Struck bodies: softer contact makes duller woody knocks; the slap rings the modes of the table."""
    wood = resonances(BOARD_MODES)
    knocks = sum(bursts([(s, db, t60)]) * noise(wood / np.hypot(1, HZ / dull_hz))
                 for s, db, dull_hz, t60 in TABLE_KNOCKS)
    slap = bursts(BOARD_SLAP) * noise(colour(SLAP_SPECTRUM))
    slap_s = BOARD_SLAP[0][0]
    steel = sum(bursts([(slap_s, db, t60)]) * np.sin(2 * np.pi * hz * T) for hz, db, t60 in TABLE_MODES)
    return knocks + slap + steel


ROOM_T60_S = 0.048


def room(x, wet_db):
    """Diffuse reverberation: a cluttered room adds a short tail that has lost its treble."""
    age = T[:SR]
    tail = rng.standard_normal(SR) * undb(-60 * age / ROOM_T60_S) * (age > .008)
    wet = signal.fftconvolve(x, tail / np.linalg.norm(tail))[:N]
    return x + undb(wet_db) * shaped(wet, 1 / (1 + 1j * HZ / 1700))


def scene():
    """Superposition: the joiner and the boards in the room, heard alike in both channels."""
    load = sum(bite(plunge) for plunge in PLUNGE_TIMES)
    speed = blade_speed(load)
    turn = 2 * np.pi * np.cumsum(speed) / SR  # blade angle [rad]
    gains, ticks = rush_gains(speed, load), chatter()
    hiss = gains[0]
    gears = rattle(speed, hiss, ticks) + slam()
    rush = dipped(air(speed, turn, gains) + gears + chips(turn, load))
    motor = rush + fading(whine(speed, turn, load, hiss)) + housing() + buzz()
    joiner = motor + scrapes(ticks)
    mono = room(joiner, wet_db=-9) + room(boards(), wet_db=-13) + shop()
    return np.array([mono, mono])


def record(dry):
    """Band limiting and overload: the microphone thins the bass, clips at 0.9 and cuts the top."""
    bass_cut = signal.butter(4, 125, "high", fs=SR, output="sos")
    top_cut = signal.ellip(10, .2, 70, TOP_HZ, fs=SR, output="sos")
    thin = signal.sosfilt(bass_cut, dry)
    return signal.sosfilt(top_cut, np.clip(thin, -.9, .9))


dry = scene()
out = record(dry)
to_wav(out)
```